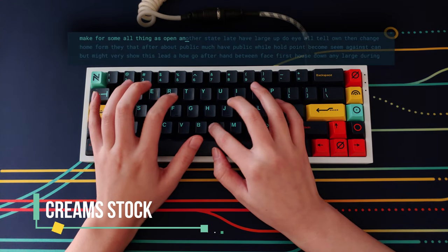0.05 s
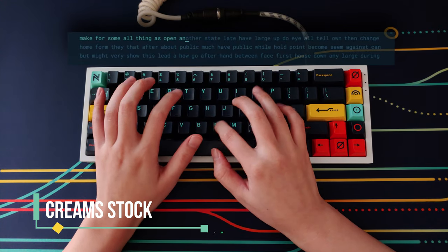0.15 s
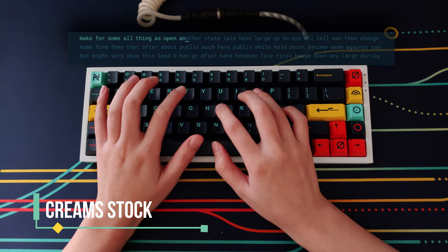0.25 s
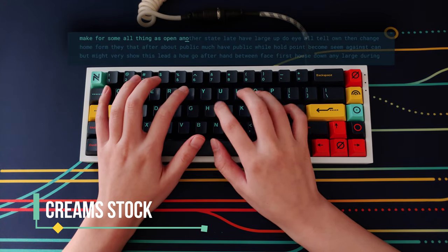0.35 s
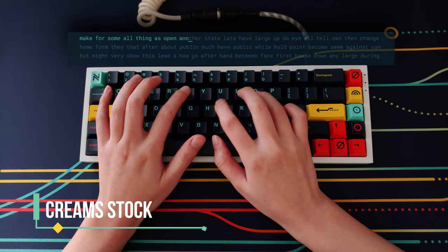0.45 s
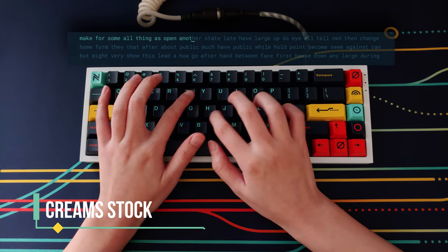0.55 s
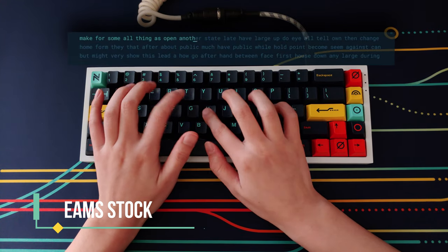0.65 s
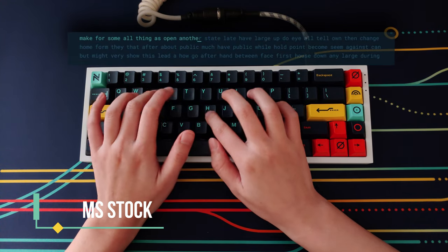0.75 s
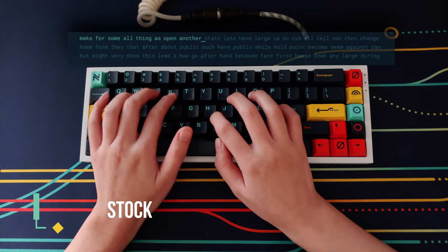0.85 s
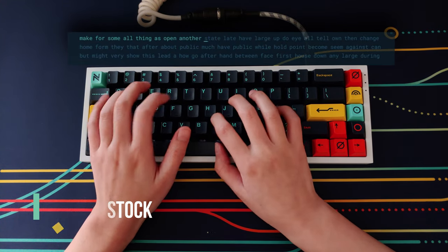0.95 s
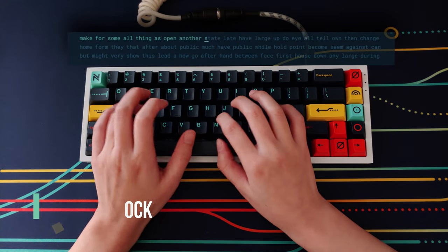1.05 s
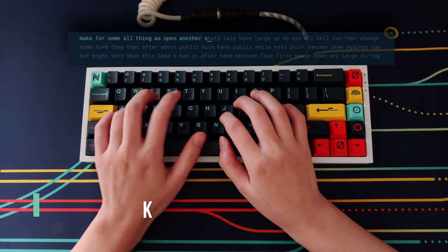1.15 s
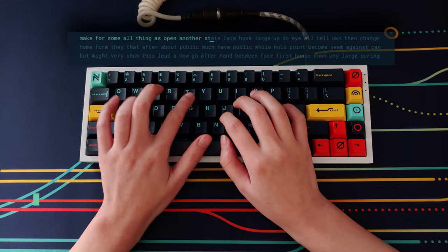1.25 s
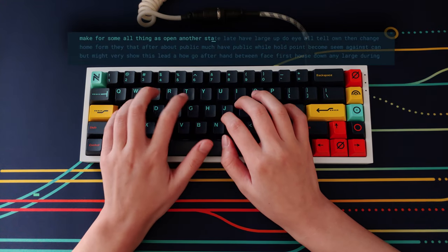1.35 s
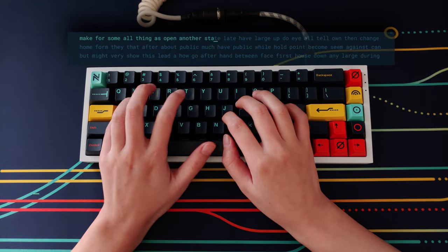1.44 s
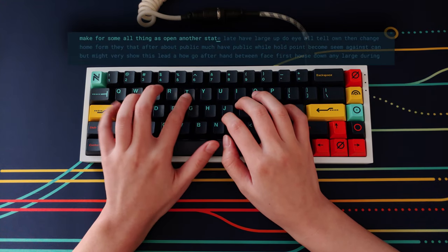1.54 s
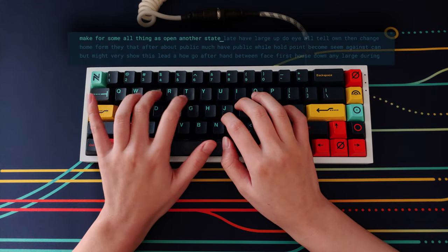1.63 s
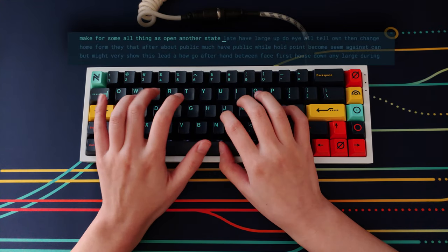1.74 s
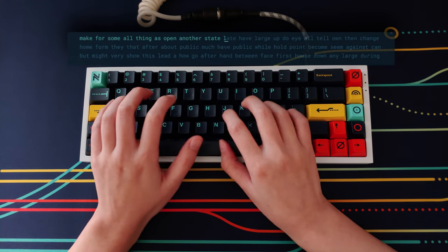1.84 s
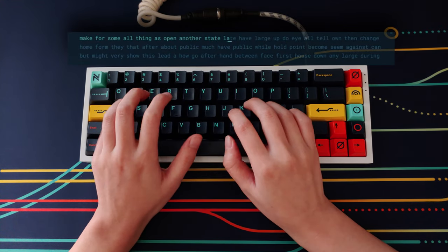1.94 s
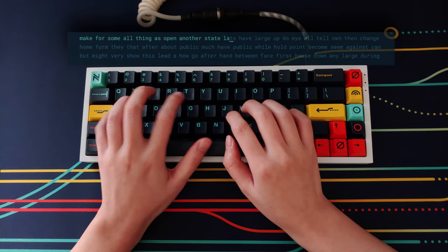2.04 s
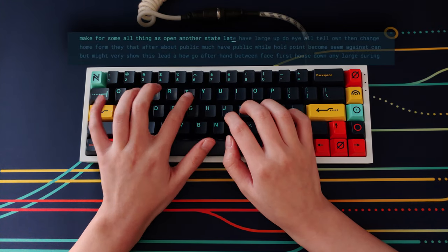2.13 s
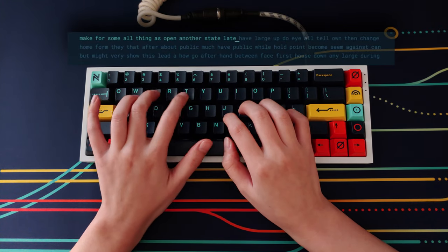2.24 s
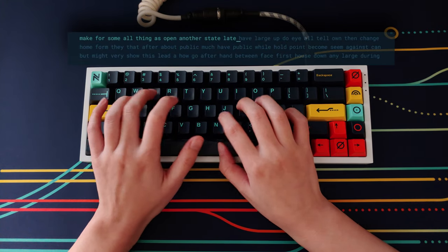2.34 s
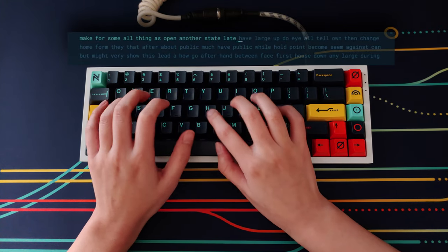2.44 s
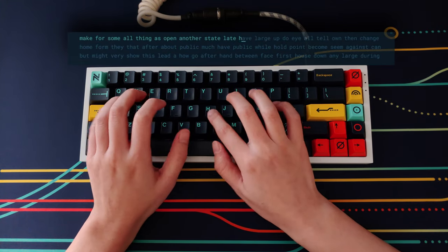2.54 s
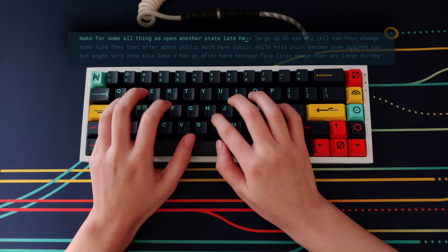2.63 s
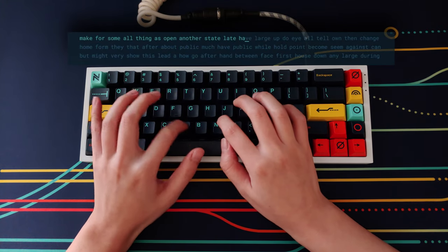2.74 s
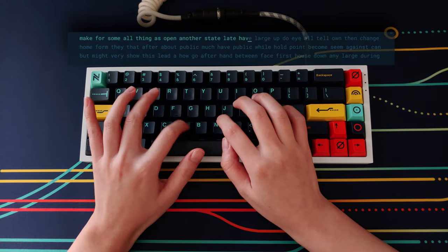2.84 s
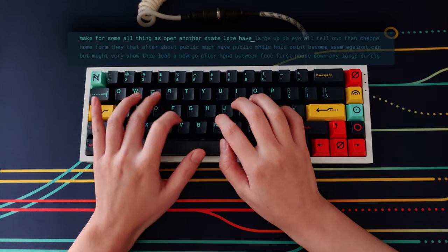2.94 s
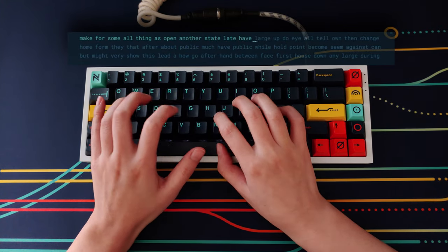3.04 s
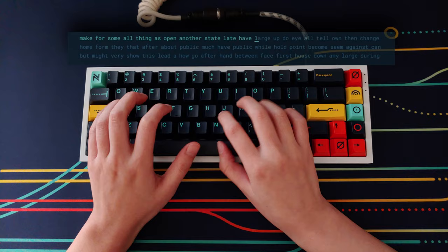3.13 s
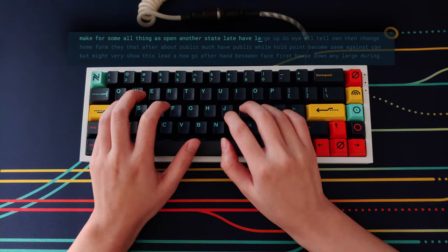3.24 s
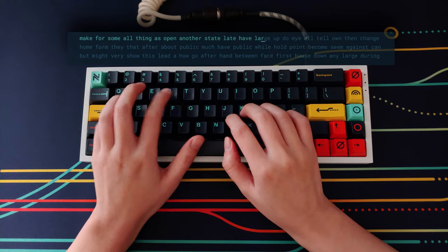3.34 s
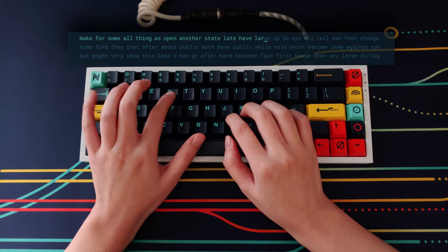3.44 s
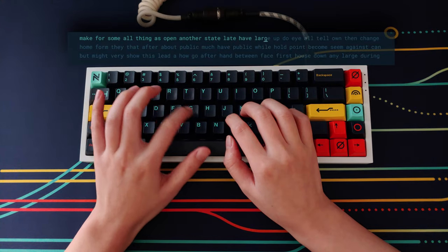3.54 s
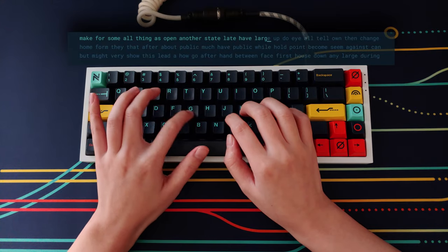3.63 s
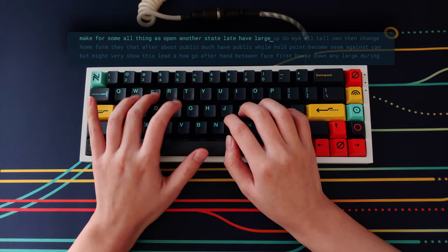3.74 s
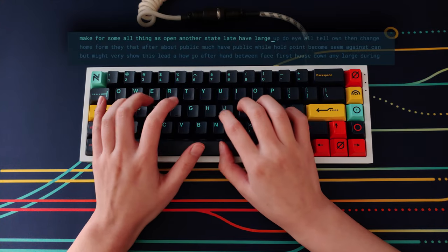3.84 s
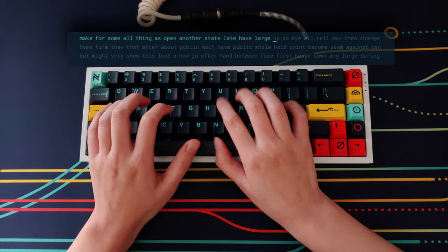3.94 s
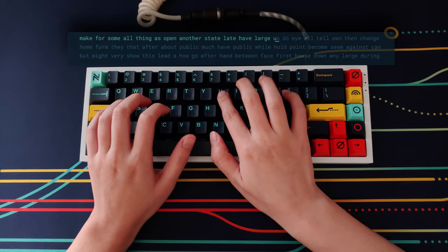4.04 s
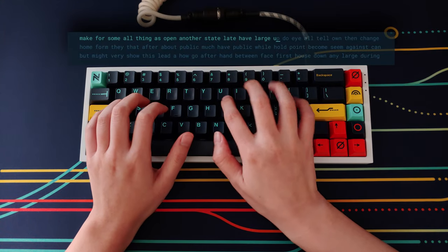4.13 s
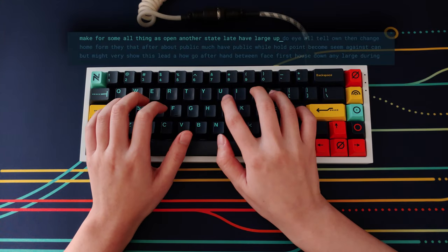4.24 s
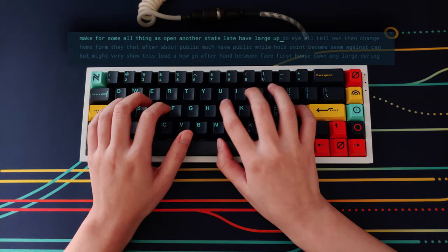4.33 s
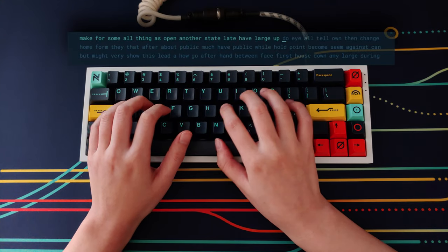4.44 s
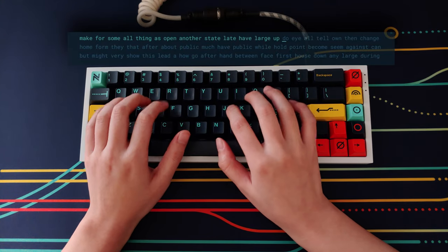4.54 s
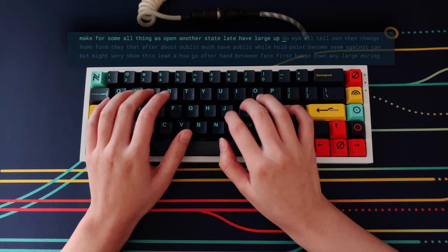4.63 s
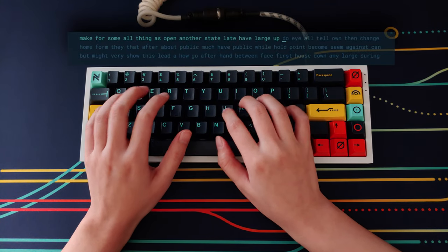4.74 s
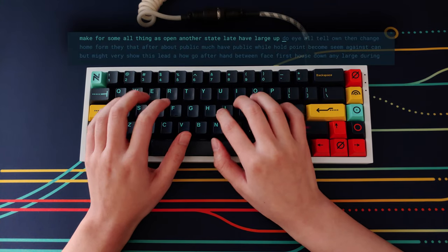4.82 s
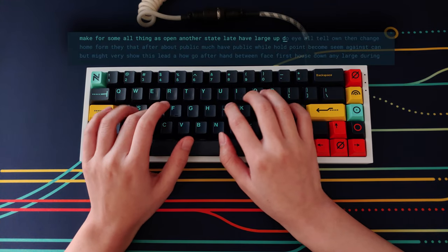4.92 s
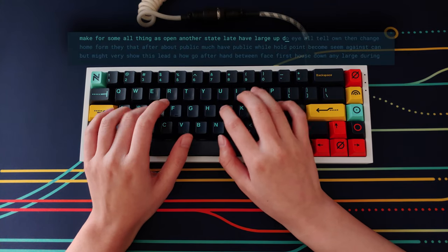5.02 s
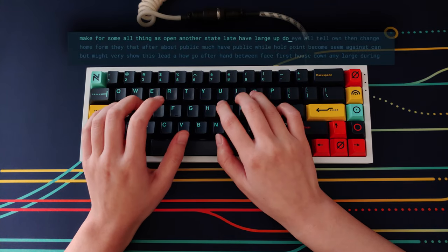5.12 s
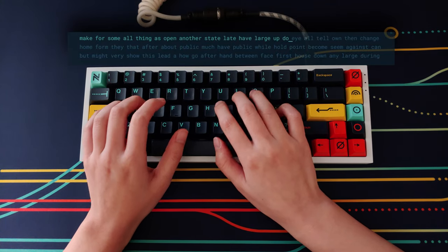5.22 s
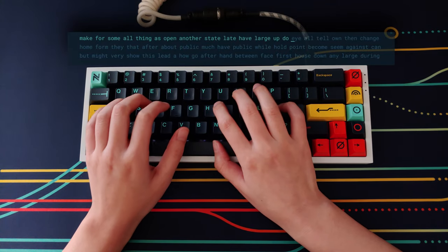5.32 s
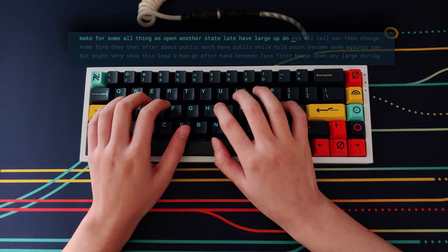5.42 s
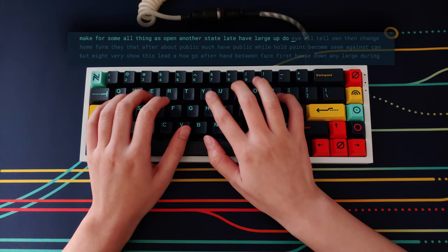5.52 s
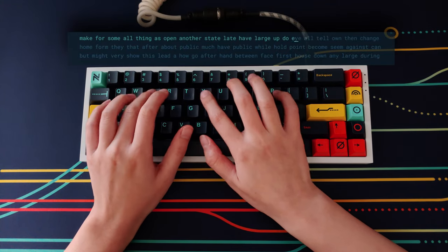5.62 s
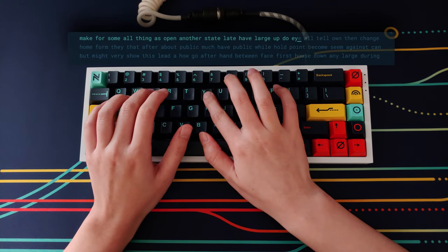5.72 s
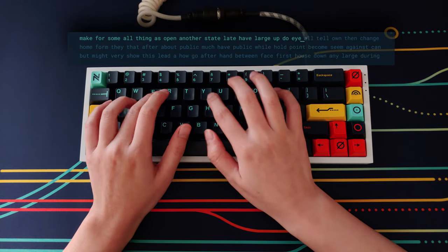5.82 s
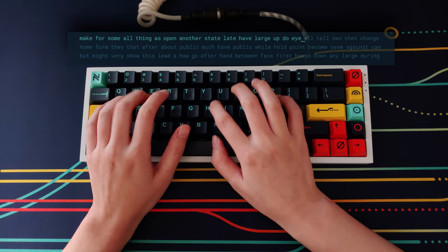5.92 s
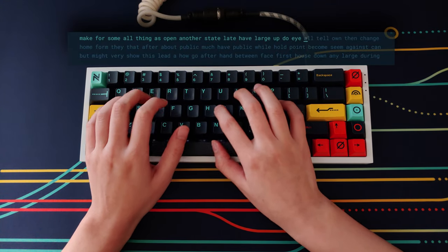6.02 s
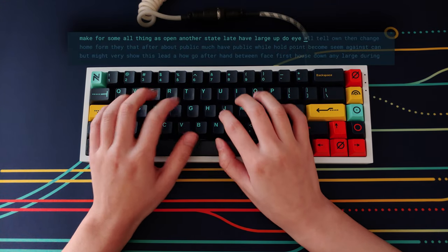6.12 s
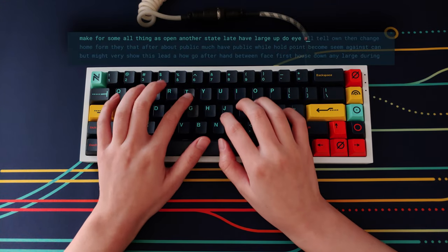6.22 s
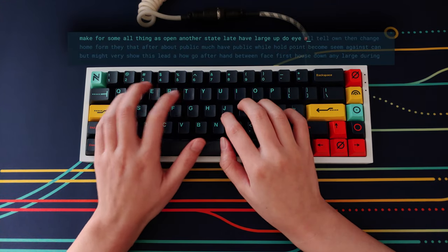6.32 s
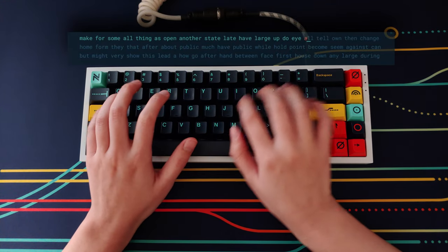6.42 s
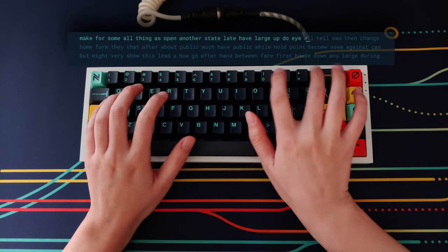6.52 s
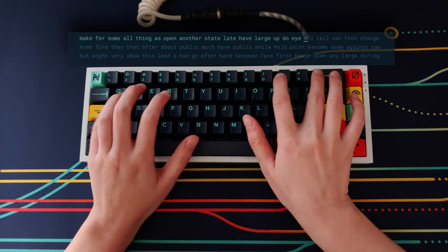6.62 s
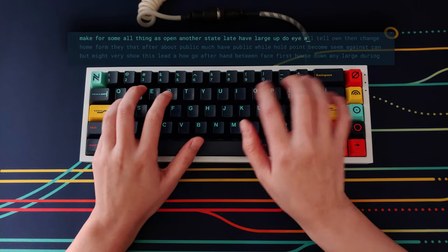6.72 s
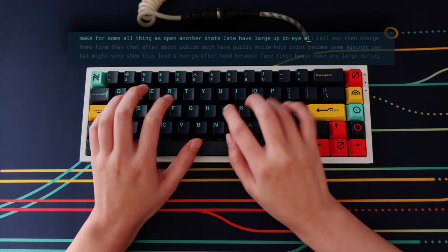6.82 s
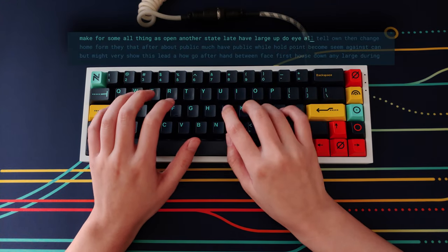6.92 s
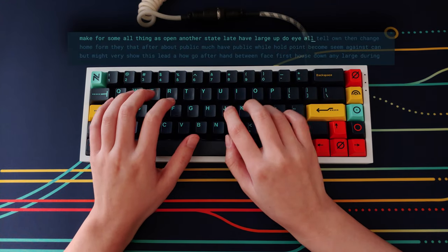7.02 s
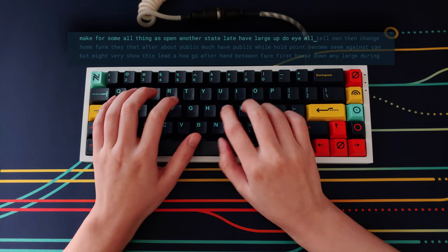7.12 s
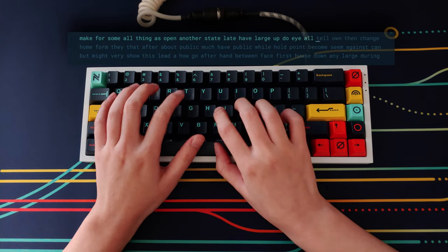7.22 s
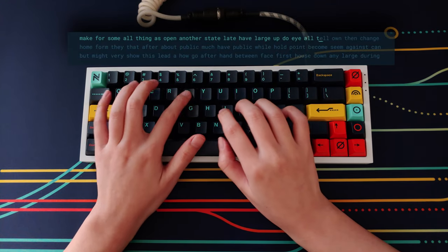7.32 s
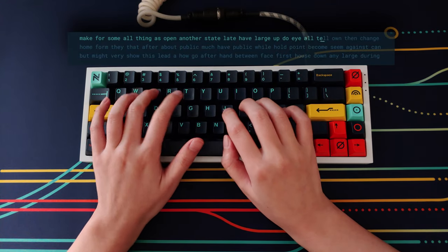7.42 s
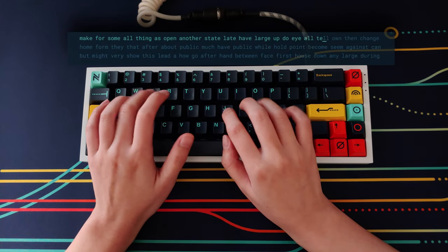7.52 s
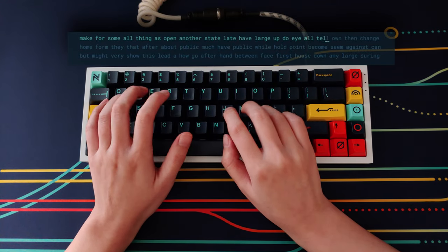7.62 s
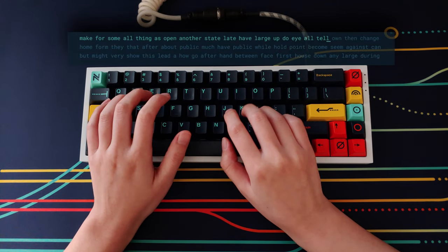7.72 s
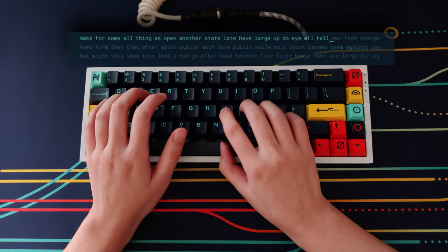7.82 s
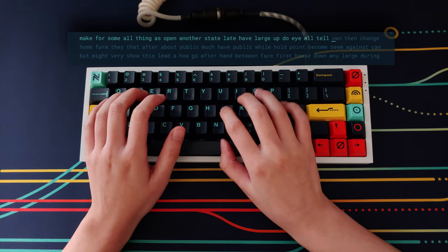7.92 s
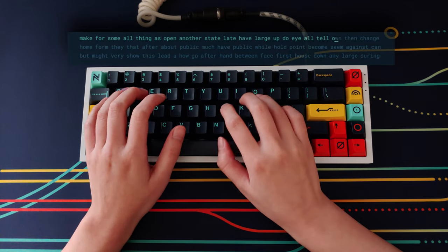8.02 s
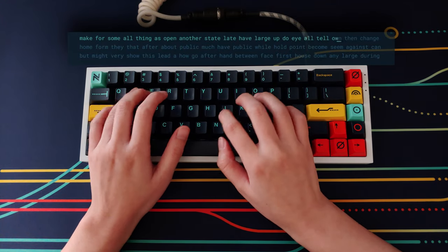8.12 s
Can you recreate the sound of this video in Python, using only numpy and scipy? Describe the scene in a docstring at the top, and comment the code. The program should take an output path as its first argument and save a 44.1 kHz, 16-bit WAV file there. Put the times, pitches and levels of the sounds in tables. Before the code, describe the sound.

A close, dry sound of fast mechanical typing in a quiet room. A sharp clack opens at 0 s, followed by a few weaker taps, then a short silence at about 0.6-0.7 s. A faint finger scuff leads into dense, uneven typing from 0.8 to 4 s, around ten or more clicks and clacks per second, some bright and ticking, others duller and hollow. Soft space bar thuds with knocking returns come near 1, 1.8, 2.4, 3.1 and 3.9 s. Strokes weaken after 4 s and stop from about 4.7 to 5 s. A short, softer burst follows, then silence around 5.4-5.7 s. Typing resumes, sparse near 6.5 s; a light scuff precedes a strong, bright clack at 6.8 s. Steady typing continues past 8 s, with space bar thuds near 7.3 and 7.9 s. Fine rattle and low desk rumble accompany the strokes.

```python
"""Fast typing on a mechanical keyboard with linear switches, heard close by in a quiet, dry room.
Each stroke is an impulsive blow that excites the decaying modes of switch, keycap, plate and case.
Noise ticks through the same modes make the rattle between hits and the scuffs of the fingers.
The damped space bar lands with a soft thud and springs back with a knock; noise through low modes
is the desk's rumble under the hands. The long pauses are silent."""
import sys
import numpy as np
from scipy import signal
from scipy.io import wavfile
from scipy.ndimage import uniform_filter1d

SR = 44100
rng = np.random.default_rng(int(sys.argv[2]) if len(sys.argv) > 2 else 0)


def digitize_waveform(pressure):
    """Quantize a signal to 16-bit integers and store it at the path in sys.argv[1].

    Rows of a 2-D input are taken as channels; values are limited to [-1, 1].
    """
    field = np.atleast_2d(pressure).T
    bounded = np.clip(field, -1, 1)
    quanta = np.round(bounded * 32767).astype(np.int16)
    wavfile.write(sys.argv[1], SR, quanta)


N = 359856
EDGE_HZ = 16300  # upper limit of the whole sound


def amp(db):
    """Logarithmic scale: decibels to amplitude gain."""
    return 10 ** (np.asarray(db) / 20)


def clock(seconds):
    """Uniform sampling: the sample times of a short sound."""
    return np.arange(int(seconds * SR)) / SR


def add(mix, start_s, sound):
    """Superposition: adds a sound into the mix in place, cutting what falls outside it."""
    at = round(start_s * SR)
    sound = sound[max(-at, 0):]
    target = mix[max(at, 0):][:len(sound)]
    target += sound[:len(target)]


def band(x, lo_hz, hi_hz, order=2):
    """Causal Butterworth band-pass filtering."""
    edges = [lo_hz, min(hi_hz, EDGE_HZ + SR / 20)]
    b, a = signal.butter(order, edges, "bandpass", fs=SR)
    return signal.lfilter(b, a, x)


def levelled(x, db, size=441):
    """Energy normalisation: sets the rms level of a sound's first samples."""
    rms = np.sqrt(np.mean(x[:size] ** 2) + 1e-20)
    return x * amp(db) / rms


def favour(x, hz, gain, width=0.06):
    """Selective resonance: brings out the modes near one frequency."""
    return x + gain * band(x, hz / (1 + width), hz * (1 + width), order=1)


def ring(modes, scatter, rise_s, size=9000, uneven_db=2):
    """Modal superposition: dying sines, their tuning, strength and phase varied at random each time."""
    hz, db, t60 = np.transpose(modes)[:, :, None]
    t = np.arange(size) / SR
    detune, strength, phase = rng.standard_normal((3, len(modes), 1))
    waves = np.sin(2 * np.pi * (hz * (1 + scatter * detune) * t + phase))
    decay = amp(db + uneven_db * strength - 60 * t / t60)
    onset = 1 - np.exp(-t / rise_s)
    return (decay * waves).sum(0) * onset


def part(modes, chatter=1.0, chatter_s=0.0027, scatter=0.012, rise_s=.0001, size=2400):
    """Impact excitation: a sharp hit, then loose pieces chattering, convolved with a part's modes."""
    t = np.arange(size) / SR
    force = rng.standard_normal(size) * np.exp(-t / chatter_s)
    force *= chatter / np.linalg.norm(force)
    force[0] += 1  # the hit itself
    sound = signal.fftconvolve(force, ring(modes, scatter, rise_s, size))[:size]
    return band(sound, 0.35 * modes[0][0], 2 * modes[-1][0])


# the room's reverberation time: f/Hz, t60/s
ROOM_DECAY = [(800, 0.18), (9000, 0.078), (15000, .15)]


def room(x, wet_db=-16, echo_s=0.0094, echo_db=-21, size=5):
    """Reverberation: one early reflection, then a diffuse tail decaying at its own rate in each band."""
    hz, _, spectrum = signal.stft(x, SR, nperseg=256)
    _, _, noise = signal.stft(rng.standard_normal(N), SR, nperseg=256)
    # energy kept from one frame to the next, 128 samples later
    keep = amp(-2 * 60 * 128 / SR / np.interp(hz, *np.transpose(ROOM_DECAY)))
    # averaging over neighbouring bins blurs the resonances
    fed = abs(uniform_filter1d(abs(spectrum) ** 2, size, axis=0))
    stored = np.zeros_like(fed)
    for k in range(2, fed.shape[1]):
        stored[:, k] = keep * stored[:, k - 1] + (1 - keep) * fed[:, k - 2]
    diffuse = np.sqrt(stored) * noise / noise.std()
    tail = signal.istft(diffuse, SR, nperseg=256)[1][:N]
    out = amp(wet_db) * band(tail, 480, EDGE_HZ)
    add(out, echo_s, amp(echo_db) * x)
    return out


# average stroke, one column a part: case level/dB, plate level/dB, keycap level/dB, switch level/dB
AVERAGE_LEVELS = (-42.5, -30, -30.5, -44)
AVERAGE_STRENGTH_DB = -30
# gain per dB of strength: case/(dB/dB), plate/(dB/dB), keycap/(dB/dB), switch/(dB/dB)
STRENGTH_GAINS = (0.59, 1, 0.97, 1.003)
# gain per dB of brightness: case/(dB/dB), plate/(dB/dB), keycap/(dB/dB), switch/(dB/dB)
BRIGHTNESS_GAINS = (-0.2, -0.12, 0.15, 0.97)
# a note above the middle shifts the sound from plate to keycap: dB per octave, middle f/Hz
NOTE_TILT_DB, MIDDLE_NOTE_HZ = 1.0, 2170
# slow drift of the bass, scaled by a share where it is used: t/s, relative level/dB
BASS_DRIFT = [(0, -3), (0.9, 0.5), (1.4, 0), (2.6, 0.5), (3.9, 1), (4.3, -1), (5.9, -1.5), (7.2, -0.5),
              (8.1, 0.5)]
# keys hitting bottom or springing back: t/s, strength level/dB,
# brightness level/dB (sets the switch's tick against an average key's), the key's own note f/Hz
KEY_STROKES = [(0.0036, -21.5, 10, 3240), (0.0306, -35.5, 6.5, 3860), (0.059, -34.5, -4, 2440),
               (0.1513, -28.5, -3, 2500), (0.2296, -45.5, -27, 1650), (0.3426, -47.5, -20.5, 1420),
               (0.4627, -41, -21, 3390), (0.542, -42.5, 1, 2730), (0.8053, -22.5, -3, 1450),
               (0.8872, -27, 4.5, 4500), (0.9218, -26, 9, 1000), (0.9881, -20.5, 11.5, 3780),
               (1.1345, -37.5, 2.5, 2850), (1.1555, -29, 2, 3240), (1.2548, -34, 3, 1300),
               (1.2998, -32, -2.5, 1000), (1.3934, -35, -1.5, 1040), (1.4204, -33, 14.5, 1760),
               (1.508, -38.5, -12.5, 1160), (1.577, -24.5, 9, 3320), (1.585, -26, 5, 3390),
               (1.694, -20, 3.5, 3950), (1.7724, -25, 0, 1450), (1.9027, -36.5, 4.5, 1240),
               (1.9291, -28, -8.5, 3170), (1.9967, -25.5, 6.5, 2850), (2.02, -23.5, 1.5, 1160),
               (2.0995, -34.5, 8, 1580), (2.1206, -31.5, 6.5, 2500), (2.167, -46, 5.5, 1220),
               (2.196, -29.5, -3, 1000), (2.2893, -27, 4, 4120), (2.298, -24.5, -2, 1580),
               (2.3806, -30.5, -1, 1420), (2.43, -43, 5.5, 2140), (2.5694, -29, -3.5, 1000),
               (2.64, -30, 8, 3540), (2.6764, -30, -7.5, 1190), (2.739, -24.5, 10, 1220),
               (2.8567, -27, 5, 3950), (2.941, -25, 4, 1070), (3.039, -22, 12.5, 1420),
               (3.0783, -40, 15, 1000), (3.2188, -34.5, 12.5, 3460), (3.2395, -28, -10, 1720),
               (3.302, -44, 13, 1760), (3.321, -28.5, 4, 2850), (3.3361, -36.5, -10, 1160),
               (3.4182, -26.5, 9, 3240), (3.4409, -21.5, 6.5, 3950), (3.5385, -31.5, 12.5, 1160),
               (3.6363, -34.5, 0, 2970), (3.65, -23.5, -0.5, 1240), (3.7275, -22.5, 4, 1270),
               (3.7655, -44.5, -2, 1480), (3.791, -22.5, 1.5, 4120), (3.873, -22, 3, 1510),
               (3.9122, -42.5, 19, 2500), (4.096, -36.5, -8.5, 1090), (4.168, -40, -0.5, 1070),
               (4.2371, -48.5, 5.5, 1620), (4.2534, -33, -3.5, 1270), (4.3397, -34, -5, 1240),
               (4.3556, -38.5, -10.5, 3620), (4.4131, -43.5, 19.5, 4310), (5.0037, -29, -0.5, 3700),
               (5.0756, -35.5, -5.5, 1220), (5.1198, -42.5, 6.5, 1450), (5.1583, -33, -12.5, 3390),
               (5.2496, -33.5, -0.5, 2550), (5.3484, -59.5, 14.5, 4500), (5.722, -35.5, -5.5, 1420),
               (5.758, -28.5, -1.5, 1040), (5.8244, -25, 7, 1040), (5.8728, -22.5, 1, 1580),
               (5.961, -27, 2.5, 1450), (6.0132, -45.5, 18.5, 2010), (6.2732, -32, 0, 1000),
               (6.3435, -27.5, 0, 1920), (6.613, -41, -3, 2610), (6.699, -61, -11, 1000),
               (6.7366, -66, 13, 3240), (6.8323, -18, 14, 3320), (6.9063, -35, 5.5, 1620),
               (6.9431, -34.5, -16.5, 1760), (7.027, -31.5, 4.5, 2850), (7.106, -33.5, -18.5, 3240),
               (7.1899, -25.5, 5, 2790), (7.365, -26.5, 3.5, 1000), (7.466, -32, -1, 2670),
               (7.5006, -22, 0.5, 1510), (7.595, -30, 0.5, 1390), (7.633, -33, 8, 3860),
               (7.6477, -31.5, -8, 3240), (7.7238, -29, -0.5, 2850), (7.799, -27, -9, 4220),
               (7.8885, -25.5, 3.5, 2790), (7.9984, -26.5, -6, 1800), (8.063, -28.5, -3.5, 4500),
               (8.1446, -29.5, -3, 2140)]


def part_levels(bass_share=0.4):
    """Spectral balance: bright hits ring the small parts, dull ones the large; a row for each stroke."""
    s, strength_db, bright_db, note_hz = np.transpose(KEY_STROKES)
    levels = AVERAGE_LEVELS + np.outer(strength_db - AVERAGE_STRENGTH_DB, STRENGTH_GAINS)
    levels += np.outer(bright_db, BRIGHTNESS_GAINS)
    octaves = np.log2(note_hz / MIDDLE_NOTE_HZ)
    levels += np.outer(NOTE_TILT_DB * octaves, (0, -1, 1, 0))
    levels[:, 0] += bass_share * np.interp(s, *np.transpose(BASS_DRIFT))
    return levels


def activity(levels_db, lead_s, linger_s, follow):
    """Power envelope: builds before each stroke and dies after it, more so for hard ones; rms of one."""
    t = np.arange(-SR // 2, SR // 2) / SR
    shape = np.exp(np.where(t < 0, t / lead_s, -t / linger_s))
    power = np.zeros(N)
    for (s, *_), db in zip(KEY_STROKES, levels_db):
        add(power, s - .5, amp(2 * follow * db) * shape)
    return levelled(np.sqrt(power), 0, size=N)


# space bar pressed and let back: down t/s, down level/dB, up t/s, up level/dB
BAR_PRESSES = [(0.988, -35, 1.088, -36), (1.811, -32, 1.903, -33.5), (2.44, -40.5, 2.513, -46.5),
               (3.102, -34.5, 3.205, -35.5), (3.935, -37, 4.006, -32), (4.414, -49, 4.509, -40),
               (5.249, -50, 5.373, -43.5), (6.046, -44, 6.126, -38.5), (7.256, -36.5, 7.343, -32),
               (7.918, -39.5, 7.999, -34)]
# modes of the desk: f/Hz, relative level/dB, t60/s
DESK_MODES = [(33, 5.5, 0.14), (64.3, -7.5, 0.082), (120.7, -12, 0.18), (217, -12, 0.015)]


def desk(rumble_db=-50.5, resting_db=-11.0, bar_db=-10, bass_share=1.6,
         rub_db=-73, rub_lo_hz=120, rub_hi_hz=220):
    """Forced vibration: noisy finger forces drive the desk's modes, wrists rub, the thumb gives pushes."""
    body = ring(DESK_MODES, scatter=0, rise_s=.003, uneven_db=0)
    shaking = signal.oaconvolve(rng.standard_normal(N), body)[:N]
    # rumble_db holds before the activity and the bass drift
    out = levelled(shaking, rumble_db, size=N)
    busy = activity(part_levels()[:, 0], lead_s=0.0057, linger_s=0.035, follow=1.0)
    out *= busy + amp(resting_db)
    out += levelled(band(rng.standard_normal(N), rub_lo_hz, rub_hi_hz), rub_db, size=N)
    drift_db = np.interp(np.arange(N) / SR, *np.transpose(BASS_DRIFT))
    out *= amp(bass_share * drift_db)
    for s, db, *_ in BAR_PRESSES:
        add(out, s, levelled(body, db + bar_db))
    return out


# modes of the plate: f/Hz, relative level/dB, t60/s
PLATE_MODES = [(1104, -13, 0.028), (1270, -5, 0.013), (1442.6, -5, 0.027), (1585, -6.5, 0.018),
               (1820, 0, 0.0055)]
# modes of the keycap: f/Hz, relative level/dB, t60/s
KEYCAP_MODES = [(2390, -13, 0.012), (2783, -3.5, 0.015), (3030, -1.5, 0.0036), (3600, -9, 0.0081),
                (4320, -3.5, 0.0027)]
# modes of the switch: f/Hz, relative level/dB, t60/s
SWITCH_MODES = [(5555, -5, 0.0018), (6710, -5.5, 0.0052), (7970, 6, 0.0015), (9635, -2, 0.0033),
                (12380, -18.5, 0.01)]
# fingers scuff across the caps: start t/s, end t/s, level/dB in the plate
CAP_SCUFFS = [(0.738, 0.796, -44), (5.653, 5.713, -50.5), (6.76, 6.801, -39.5)]


def rattle(plate_db=-48, cap_db=-51.5, switch_db=-58.0, per_s=900, spread_db=5,
           wire_db=-44, wire_s=0.0079, count=5):
    """Random impulse excitation: wobbling caps and rubbing stems tick on one key after another."""
    _, *levels_db = part_levels().T
    ticks = (rng.random(N) < per_s / SR) * amp(spread_db * np.minimum(rng.standard_normal(N), 2))
    # about 40 times a second another run of ticks begins, on a key drawn anew
    run = np.cumsum(rng.random(N) < 40 / SR)
    ticks *= amp(spread_db * rng.standard_normal(N).clip(-2, 2))[run]
    key = rng.integers(0, count, N)[run]
    out = np.zeros(N)
    parts = (PLATE_MODES, KEYCAP_MODES, SWITCH_MODES)
    for modes, rattle_db, hits_db in zip(parts, (plate_db, cap_db, switch_db), levels_db):
        level = amp(rattle_db) * activity(hits_db, lead_s=0.0036, linger_s=0.014, follow=0.71)
        for start, end, db in CAP_SCUFFS:
            scuff = np.full(len(clock(end - start)), amp(db + rattle_db - plate_db))
            add(level, start, scuff)
        for s, *_ in BAR_PRESSES:  # the bar's stabiliser wire chatters on the way down
            add(level, s - 2 * wire_s, amp(wire_db) * np.hanning(int(2 * wire_s * SR)))
        rings = np.zeros(N)
        for k in range(count):
            body = levelled(part(modes), 0)
            rings += signal.oaconvolve(ticks * (key == k), body)[:N]
        out += level * levelled(rings, 0, size=N)
    return out


# modes of the case: f/Hz, relative level/dB, t60/s
CASE_MODES = [(372.9, 1.5, 0.17), (431, -8, 0.26), (570.6, -5.5, 0.11), (672.4, 0, 0.088),
              (808, 1.5, 0.023)]


def case():
    """Cavity resonance: the hollow case swells, its modes weighted at random for each blow."""
    return band(ring(CASE_MODES, scatter=0.01, rise_s=0.00063, uneven_db=6.0), 200, 1200)


def push(lo_hz=95, hi_hz=290, fade_s=0.016, rise_s=0.002):
    """Damped noise burst: the dull, toneless thump of the board pressed into its feet."""
    t = clock(0.13)
    envelope = np.exp(-t / fade_s) * (1 - np.exp(-t / rise_s))
    return band(rng.standard_normal(len(t)) * envelope, lo_hz, hi_hz)


def spring(travel_s=0.02, lo_hz=2900, hi_hz=5600):
    """Friction noise: the bar's stem rubs softly on its way up; gives (offset in s, sound)."""
    t = clock(travel_s)
    rub = rng.standard_normal(len(t)) * np.sin(np.pi * t / travel_s) ** .5
    return -travel_s, band(signal.fftconvolve(rub, part(KEYCAP_MODES)), lo_hz, hi_hz)


def thumb(bar_gain=2.5, knock_db=-8, damp_s=0.22, push_db=-12.5, return_low_gain=0.69,
          return_knock_db=0, return_cap_db=-10, return_tick_db=-22, spring_db=-55):
    """Damped impact: the padded bar favours the lowest case mode, then springs back with a dull knock."""
    out = np.zeros(N)
    lowest_hz = CASE_MODES[0][0]
    for down_s, down_db, up_s, up_db in BAR_PRESSES:
        thud = favour(case(), lowest_hz, bar_gain)
        damping = np.exp(-np.arange(len(thud)) / SR / damp_s)
        add(out, down_s, levelled(thud * damping, down_db))
        add(out, down_s, levelled(push(), down_db + push_db, size=900))
        add(out, down_s, levelled(part(PLATE_MODES), down_db + knock_db))
        lead_s, rub = spring()
        add(out, up_s + lead_s, levelled(rub, spring_db, size=900))
        rebound = favour(case(), lowest_hz, return_low_gain)
        add(out, up_s, levelled(rebound * damping, up_db))
        add(out, up_s, levelled(part(PLATE_MODES, rise_s=0.00037), up_db + return_knock_db))
        add(out, up_s, levelled(band(part(KEYCAP_MODES), 1456, 4000), up_db + return_cap_db))
        add(out, up_s, levelled(part(SWITCH_MODES), up_db + return_tick_db))
    return out


def stroke(case_db, plate_db, cap_db, switch_db, note_hz, note_gain=2.9, hard_db=-25):
    """Inertia: the switch ticks at once, the cap clacks, the heavier plate and case swell after them."""
    plate = favour(part(PLATE_MODES, chatter=0.86, rise_s=0.00059), note_hz, note_gain)
    cap = favour(part(KEYCAP_MODES, chatter=0.79), note_hz, note_gain)
    # the louder the switch, the more its housing pings
    ping_hz = SWITCH_MODES[-2][0]
    switch = favour(part(SWITCH_MODES), ping_hz, amp(switch_db - hard_db))
    out = levelled(case(), case_db)
    add(out, 0, levelled(plate, plate_db) + levelled(cap, cap_db) + levelled(switch, switch_db))
    return out


def typing(touch_db=-22, touch_s=0.0054):
    """Superposed impacts: every key stroke, each preceded by a faint brush of stem on housing."""
    out = np.zeros(N)
    for (s, *_, note_hz), (case_db, plate_db, cap_db, switch_db) in zip(KEY_STROKES, part_levels()):
        add(out, s, stroke(case_db, plate_db, cap_db, switch_db, note_hz))
        touch = levelled(part(KEYCAP_MODES), cap_db) + levelled(part(SWITCH_MODES), switch_db)
        # touch_s is the mean lead of the brush
        add(out, s - touch_s * rng.exponential(), amp(touch_db) * touch)
    return out


def scene():
    """Linear superposition: the keyboard, its room response and the desk."""
    keys = typing() + thumb() + rattle()
    return (keys + room(keys) + desk())[None]


# silent pauses: start t/s, end t/s
SILENCES = [(.575, .733), (4.66, 4.98), (5.43, 5.657)]


def record(dry, fade_s=0.089):
    """Gating and band limiting: fades out before each pause, returns 20 times faster, clips, low-passes."""
    t = np.arange(N) / SR
    out = dry
    for start, end in SILENCES:
        gate = np.maximum((start - t) / fade_s, 20 * (t - end) / fade_s)
        out = out * np.clip(gate, 0, 1)
    lowpass = signal.firwin(255, EDGE_HZ, window=("kaiser", 9), fs=SR)
    return signal.oaconvolve(np.clip(out, -.95, .95), lowpass[None], "same")


dry = scene()
out = record(dry)
digitize_waveform(out)
```